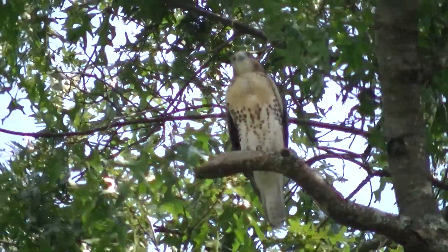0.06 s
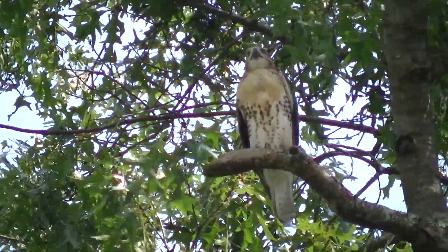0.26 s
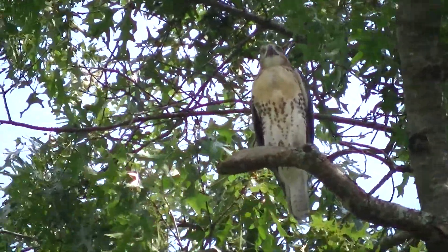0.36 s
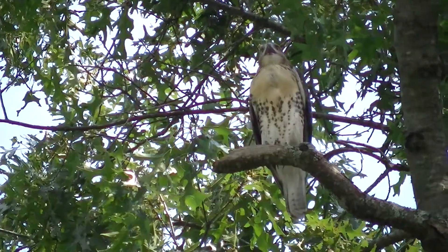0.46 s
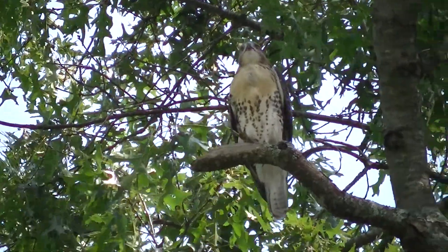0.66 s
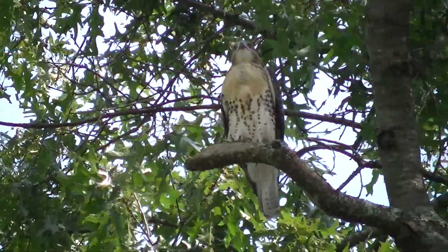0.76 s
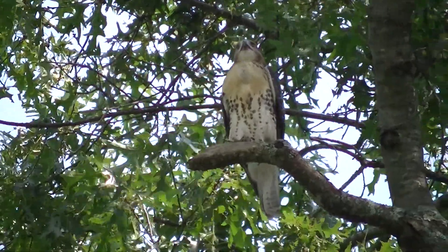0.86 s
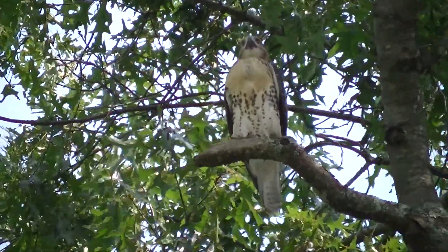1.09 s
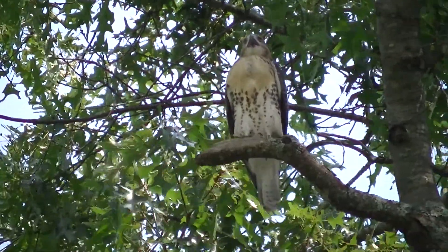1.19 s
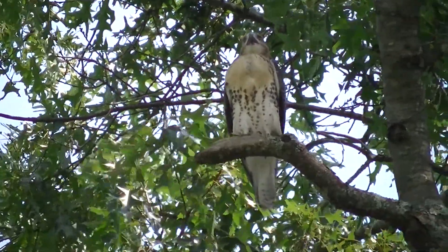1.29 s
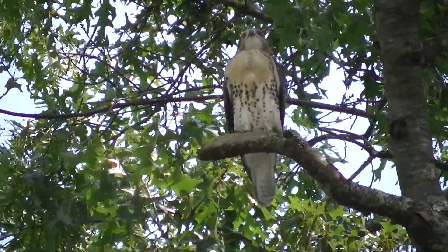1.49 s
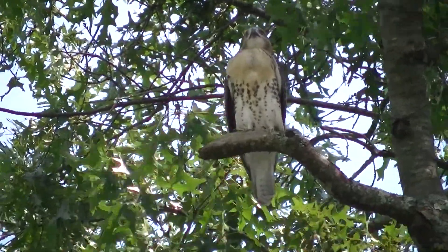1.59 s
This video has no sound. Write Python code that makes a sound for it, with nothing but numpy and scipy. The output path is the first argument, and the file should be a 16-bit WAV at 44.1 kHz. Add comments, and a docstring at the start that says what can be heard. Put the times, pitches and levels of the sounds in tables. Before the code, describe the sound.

Two short, piercing hawk cries outdoors, picked up at a moderate distance, nearly centred. Each slides up, breaks into a rasping shriek and falls, leaving a soft echo in the trees over quiet air and low hum.

```python
"""Outdoor noise and a wavering low hum lie under the dying ring of an earlier scream.
A hawk on a branch then screams twice. Each scream slides up into a clear harmonic whistle with weak
half tones, cracks into a higher, rougher register where two voices beat, and drops back as it dies.
Decaying noise and one delayed copy make the echo from the trees. A sharp dry tick, a burst of
filtered noise, sounds as the first scream ends; a much fainter one follows the second."""
import sys
import numpy as np
from scipy import signal
from scipy.fft import rfft, irfft
from scipy.io import wavfile
from scipy.ndimage import uniform_filter1d

SR = 44100
rng = np.random.default_rng(int(sys.argv[2]) if len(sys.argv) > 2 else 0)


def wav_record(signal):
    """Record a signal, one row per channel, as 16-bit PCM in the file named by sys.argv[1]."""
    frames = np.transpose(np.atleast_2d(signal))
    bounded = np.clip(frames, -1, 1)
    # unit amplitude maps onto the largest positive 16-bit level
    quanta = np.round(bounded * 32767).astype(np.int16)
    wavfile.write(sys.argv[1], SR, quanta)


N = 72765
T = np.arange(N) / SR  # time [s]
JITTER_RATE_HZ = 320  # corner rate of the voice's pitch and level flutter


def amp(db):
    """Level law: decibels to amplitude gain."""
    return 10 ** (np.asarray(db) / 20)


def unit(x):
    """Normalisation of signal power: scales to rms 1."""
    return x / np.sqrt(np.mean(x ** 2) + 1e-20)


def read(points, hz):
    """Interpolates a spectrum linearly on a log-frequency axis."""
    f, value = np.transpose(points)
    return np.interp(np.log(hz + 1), np.log(f + 1), value)


def colour(x, points):
    """Linear filtering: multiplies the Fourier spectrum by a gain curve in dB."""
    hz = np.fft.rfftfreq(x.shape[-1], 1 / SR)
    return irfft(rfft(x) * amp(read(points, hz)), x.shape[-1])


def wander(rate_hz):
    """Random modulation: white noise of rms 1, weakened above a corner rate."""
    hz = np.fft.rfftfreq(N, 1 / SR)
    spectrum = rfft(rng.standard_normal(N)) / np.sqrt(1 + (hz / rate_hz) ** 4)
    return unit(irfft(spectrum, N))


def phase_of(hz):
    """Phase is the time integral of angular frequency."""
    return 2 * np.pi * np.cumsum(hz) / SR


def tone(phase, db):
    """Simple harmonic oscillation: a sine of the given rms level."""
    return np.sqrt(2) * amp(db) * np.sin(phase)


def partials(phase, table, db):
    """Superposition of tones on whole and half multiples of one pitch."""
    return sum(tone(multiple * phase, db + relative_db) for multiple, relative_db in table)


def bump(t, width):
    """Gaussian envelope around time zero."""
    return np.exp(-(t / width) ** 2 / 2)


def pan(left_db):
    """Interchannel level difference: gains of the left and right channels."""
    return amp([[left_db / 2], [-left_db / 2]])


def pair():
    """Diffuse field: two noises whose correlation depends on frequency."""
    # (frequency [Hz], left-right correlation [0 to 1])
    likeness = [(60, 0.97), (125, 0.99), (250, 0.92), (600, 0.96), (1300, 0.92), (3000, .93), (8000, 0.9),
                (12000, 1)]
    a, b = rfft(rng.standard_normal((2, N)))
    same = np.clip(read(likeness, np.fft.rfftfreq(N, 1 / SR)), 0, .999)
    mid = a * np.sqrt((1 + same) / 2)
    side = b * np.sqrt((1 - same) / 2)
    return irfft(np.array([mid + side, mid - side]), N)


def old_echo():
    """Exponential decay: the wood still rings in narrow bands with an earlier scream."""
    # (frequency [Hz], width of the random frequency modulation [Hz], level at time zero [dB])
    ring_bands = [(2490, 40, -53), (5030, 130, -70)]
    t60_s, flutter = 1.2, .4  # flutter: rms share of the amplitude
    ring = 0
    for hz, width, db in ring_bands:
        phase = phase_of(hz + width / 2 * wander(width))
        ring = ring + tone(phase, db) * (1 + flutter * wander(width))
    return ring * amp(-60 * T / t60_s)


def background():
    """Superposition of broadband outdoor noise and distant, frequency-modulated hums."""
    # spectrum of the outdoor noise (frequency [Hz], relative level [dB])
    air_spectrum = [(15, -78.5), (25, -31), (55, -10), (156, -4), (183, -8), (221, -6), (340, -11.5),
                    (537, -8), (782, -8.5), (848, -8), (1750, -18), (1900, -18.5), (2230, -22.5),
                    (2420, -15.5), (2850, -25), (3170, -27.5), (3530, -26), (5140, -31), (15500, -53)]
    # distant hums (middle of rise [s], middle of fall [s], frequency [Hz], level [dB])
    hum_tones = [(0, 1.7, 113.9, -59), (.2, .42, 215, -57.5), (.62, 1.7, 161.2, -60),
                 (1.1, 1.7, 71.6, -59.5)]
    air_db, rise_s, waver, left_db = -48.5, 0.18, .015, .3  # waver: rms share of the frequency
    hum = 0
    for start, end, hz, db in hum_tones:
        fade = np.clip(np.minimum(T - start, end - T) / rise_s + .5, 0, 1)
        hum = hum + tone(phase_of(hz * (1 + waver * wander(8))), db) * fade
    air = amp(air_db) * unit(colour(pair(), air_spectrum))
    return pan(left_db) * (air + hum)


def gesture(rows):
    """Voice control: the on-off gate of one register, then its smoothed curves."""
    edge_s = 0.0024  # switch between registers
    s, *columns = np.transpose(rows)
    gate = np.clip(np.minimum(T - s[0], s[-1] - T) / edge_s + .8, 0, 1)
    curves = [uniform_filter1d(np.interp(T, s, c), size=220) for c in columns]
    return [np.sin(gate * np.pi / 2) ** 2] + curves


def rasp(db):
    """Turbulence: air noise in the throat, filtered to a band near the voice."""
    # (frequency [Hz], relative level [dB])
    throat_spectrum = [(1000, -25.5), (1700, -20), (2200, -5.5), (2900, 12), (4000, -21), (5500, -16),
                       (8000, -21), (14000, -47)]
    return amp(db) * unit(colour(rng.standard_normal(N), throat_spectrum))


def whistle(rows):
    """Harmonic series: a scraping start, a steady tone, half tones that swell before the crack."""
    # half tones (multiple of the pitch, level under the voice before the swell [dB])
    half_tones = [(.5, -42), (1.5, -34), (2.5, -58), (3.5, -57)]
    # the period doubles briefly as the voice catches (multiple of the pitch, level before gain [dB])
    catch_tones = [(.5, -53.5), (1.5, -41.5), (2.5, -57.5)]
    gain_db, rasp_db, scrape_db = 2, -43, -50
    second_least_db, fourth_db, fifth_db = -28, -66, -66  # harmonics, relative to the fundamental
    jitter, onset_jitter = .001, .017  # rms share of the pitch
    shimmer, onset_shimmer = .012, .45  # rms share of the amplitude
    onset_s, scrape_s = .016, .012  # widths of the bell curves
    swell_db, swell_s = 19, 0.016
    catch_lag_s, catch_width_s = 0.024, 0.012

    gate, hz, db, second_db, third_db = gesture(rows)
    age = T - rows[0][0]
    left = np.maximum(rows[-1][0] - T, 0)  # time left before the crack
    shaky = bump(age, onset_s)
    phase = phase_of(hz * (1 + (jitter + onset_jitter * shaky) * wander(JITTER_RATE_HZ)))

    second_db = np.maximum(second_db, db + second_least_db)
    levels = [db, second_db, third_db, db + fourth_db, db + fifth_db]
    voice = sum(tone(k * phase, level) for k, level in enumerate(levels, 1))
    voice += partials(phase, half_tones, db + swell_db * np.exp(-left / swell_s))
    voice += partials(phase, catch_tones, 0) * bump(age - catch_lag_s, catch_width_s)

    flutter = 1 + (shimmer + onset_shimmer * shaky) * wander(JITTER_RATE_HZ)
    scrape = rasp(scrape_db) * bump(age, scrape_s)
    return gate * amp(gain_db) * (voice * flutter + rasp(db + rasp_db)) + scrape


def trees(x):
    """Reverberation: convolution with quick scatter from branches and a long faint wood echo."""
    # (frequency [Hz], gain [dB])
    echo_colour = [(500, 1.5), (2400, 5.5), (3200, 13), (5000, 7), (7000, 9.5), (12000, 5)]
    near_db, near_t60_s = -20, .25
    far_db, far_t60_s, far_rise_s = -29.5, 1.05, 0.12
    near = pair() * amp(-60 * T / near_t60_s) * (T > .003)
    far = pair() * amp(-60 * T / far_t60_s) * np.minimum(T / far_rise_s, 1)
    # each part is scaled to unit energy in the left channel before its gain
    tail = amp(near_db) * near / np.linalg.norm(near[0])
    tail += amp(far_db) * far / np.linalg.norm(far[0])
    return signal.fftconvolve(colour(x, echo_colour)[None], tail, axes=1)[:, :N]


def slap(x):
    """Discrete reflection: one delayed, filtered copy from the trunks."""
    # (frequency [Hz], gain before the overall echo gain [dB])
    slap_colour = [(500, -21), (2500, -18.5), (3150, 6.5), (3400, 12), (5000, -17), (6400, -14.5),
                   (12000, -17.5)]
    delay_s, echo_db = .166, -31
    return amp(echo_db) * np.interp(T - delay_s, T, colour(x, slap_colour), left=0)


def shriek(rows):
    """Intermodulation: a weaker, lower voice beats with the high one and makes side tones."""
    # (multiple of the pitch, level under the voice [dB])
    shriek_tones = [(.5, -28), (3, -54)]
    # lower voice and side tones (multiple of the pitch, multiple of the beat, level under the voice [dB])
    beat_tones = [(1, -1, -11), (1, 1, -24), (2, -1, -22.5), (2, -2, -27), (2, 1, -44.5)]
    beat_hz, gain_db, rasp_db = 658, 1.5, -23
    jitter, beat_jitter, shimmer = .0015, .025, .04  # rms shares of pitch, beat and amplitude
    gate, hz, db, second_db = gesture(rows)
    phase = phase_of(hz * (1 + jitter * wander(JITTER_RATE_HZ)))
    beat = phase_of(beat_hz * (1 + beat_jitter * wander(JITTER_RATE_HZ)))
    voice = tone(phase, db) + tone(2 * phase, second_db)
    voice += partials(phase, shriek_tones, db)
    voice += sum(tone(k * phase + m * beat, db + relative_db) for k, m, relative_db in beat_tones)
    flutter = 1 + shimmer * wander(JITTER_RATE_HZ)
    return gate * amp(gain_db) * (voice * flutter + rasp(db + rasp_db))


def drop(rows):
    """Subharmonic voice: falls back to the low register and sags, hoarse with noise."""
    # (multiple of the pitch, level relative to the voice [dB])
    drop_tones = [(.5, -27), (1, 0), (1.5, -17), (2, -17), (2.5, -31), (3, -26)]
    gain_db, rasp_db = -0.5, -17
    jitter, shimmer = .008, .14  # rms shares of pitch and amplitude
    gate, hz, db = gesture(rows)
    phase = phase_of(hz * (1 + jitter * wander(JITTER_RATE_HZ)))
    voice = partials(phase, drop_tones, db)
    flutter = 1 + shimmer * wander(JITTER_RATE_HZ)
    return gate * amp(gain_db) * (voice * flutter + rasp(db + rasp_db))


def tick(s, db):
    """Impulsive noise: a dry snap with a short scattered tail, both decaying exponentially."""
    # (frequency [Hz], relative level [dB])
    tick_spectrum = [(150, -24), (400, -6), (1000, -2), (1900, 0), (3000, -1), (4500, -14), (6200, -15),
                     (9000, -38), (15000, -64)]
    snap_s, tail_db, tail_s = .0025, -13, .007  # time constants to 1/e
    age = np.maximum(T - s, 0)
    shape = (T > s) * (np.exp(-age / snap_s) + amp(tail_db) * np.exp(-age / tail_s))
    noise = rng.standard_normal(N)
    return amp(db) * colour(shape * noise, tick_spectrum) / np.std(colour(noise, tick_spectrum))


def scene():
    """Superposition of direct sound, reflections and background: two screams and two ticks."""
    # clear whistles (time [s], pitch [Hz], then levels before the register gain:
    # fundamental [dB], second harmonic [dB], third harmonic [dB])
    whistle_1 = [(0.222, 1901, -55, -74.5, -90), (0.242, 2224, -38.5, -45, -60.5),
                 (0.282, 2350, -28.5, -37.5, -51.5), (0.288, 2325, -34.5, -37.5, -74),
                 (0.296, 2378, -28.5, -60, -51), (0.332, 2413, -25.5, -35, -51.5),
                 (0.372, 2393, -26.5, -41.5, -52.5), (0.38, 2421, -25.5, -43.5, -63),
                 (0.386, 2366, -31, -49, -59.5), (0.412, 2385, -26.5, -71, -61),
                 (0.434, 2407, -24, -36, -57), (0.454, 2468, -26, -45, -61.5), (0.472, 2545, -32, -36, -65),
                 (0.482, 2546, -25.5, -35.5, -61)]
    whistle_2 = [(0.966, 2194, -57, -70, -90), (0.984, 2186, -39, -48.5, -63.5),
                 (0.998, 2412, -35.5, -51, -63.5), (1.008, 2376, -29.5, -83, -64),
                 (1.018, 2413, -31.5, -38, -51), (1.066, 2491, -27.5, -43.5, -52.5),
                 (1.104, 2478, -26, -38, -53.5), (1.13, 2484, -26, -69.5, -56.5),
                 (1.14, 2483, -26, -46.5, -55), (1.152, 2490, -25.5, -46.5, -57.5),
                 (1.172, 2516, -33, -33, -62.5), (1.208, 2600, -24.5, -47, -62),
                 (1.217, 2722, -33.5, -50, -85)]
    # high register (time [s], pitch [Hz], levels before the register gain:
    # fundamental [dB], second harmonic [dB])
    shriek_1 = [(0.484, 3153, -33.5, -48.5), (0.498, 3141, -34, -49.5), (0.532, 3129, -30, -46.5),
                (0.54, 3038, -39.5, -56.5), (0.55, 3069, -34.5, -43), (0.556, 3026, -21, -63.5),
                (0.561, 2820, -44, -69)]
    shriek_2 = [(1.219, 3256, -31, -54), (1.231, 3240, -28, -51), (1.267, 3231, -31, -56),
                (1.289, 3206, -29.5, -43.5), (1.305, 3156, -39.5, -59), (1.318, 3132, -37, -46.5),
                (1.332, 2997, -32.5, -65)]
    # closing drop (time [s], pitch [Hz], level before the register gain [dB])
    drop_1 = [(.562, 2415, -29.5), (.571, 2362, -30), (.58, 2325, -34.5), (.598, 2244, -39)]
    drop_2 = [(1.332, 2461, -31.5), (1.351, 2415, -31), (1.359, 2360, -42), (1.374, 2190, -51)]
    # dry ticks (time [s], noise level before the decay [dB])
    tick_times = [(.5925, -27), (1.528, -47)]
    hawk_left_db = .5
    first_scream = whistle(whistle_1) + shriek(shriek_1) + drop(drop_1)
    second_scream = whistle(whistle_2) + shriek(shriek_2) + drop(drop_2)
    direct = first_scream + second_scream + sum(tick(s, db) for s, db in tick_times)
    wood = direct + trees(direct) + slap(direct) + old_echo()
    return pan(hawk_left_db) * wood + background()


def record(dry):
    """Band limitation: a linear-phase low-pass filter, the recorder's upper limit."""
    cutoff_hz = 15700
    taps = signal.firwin(511, cutoff_hz, window=("kaiser", 9), fs=SR)
    return signal.oaconvolve(dry, taps[None], "same")


dry = scene()
out = record(dry)
wav_record(out)
```